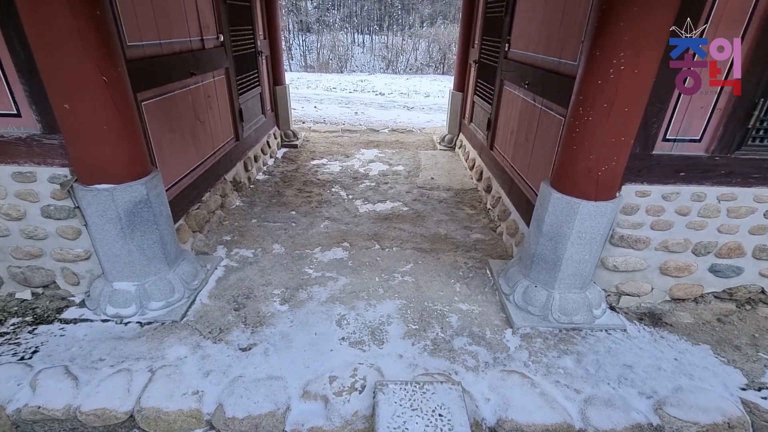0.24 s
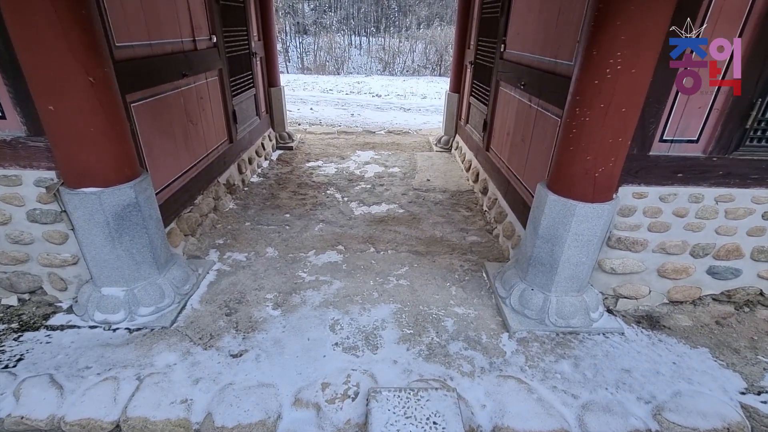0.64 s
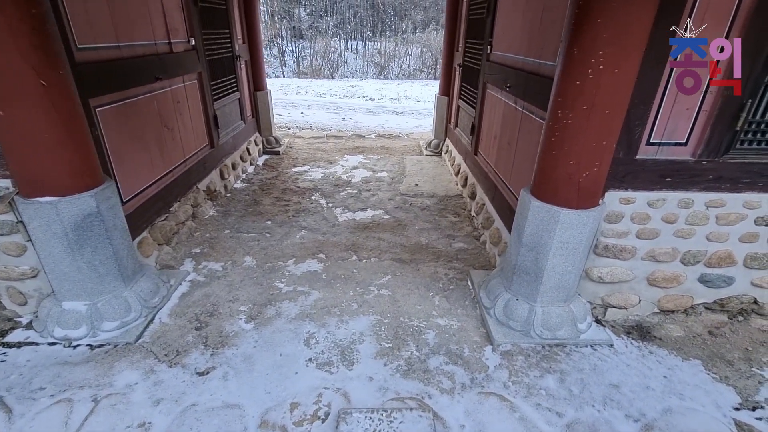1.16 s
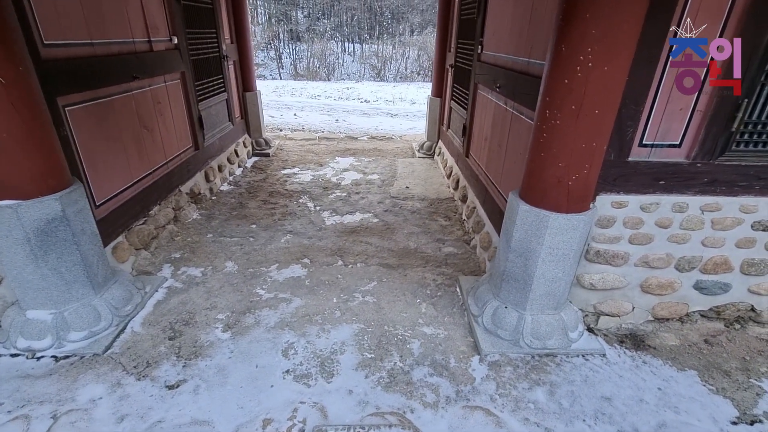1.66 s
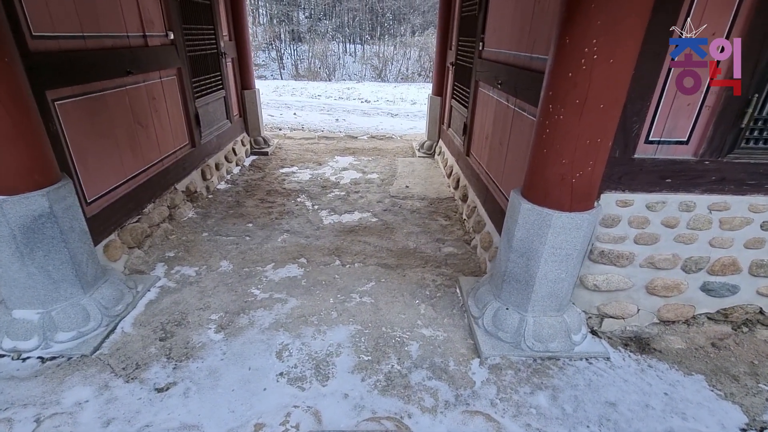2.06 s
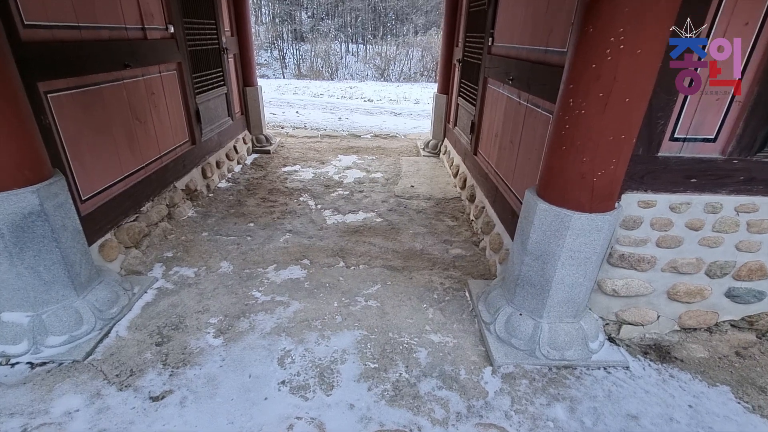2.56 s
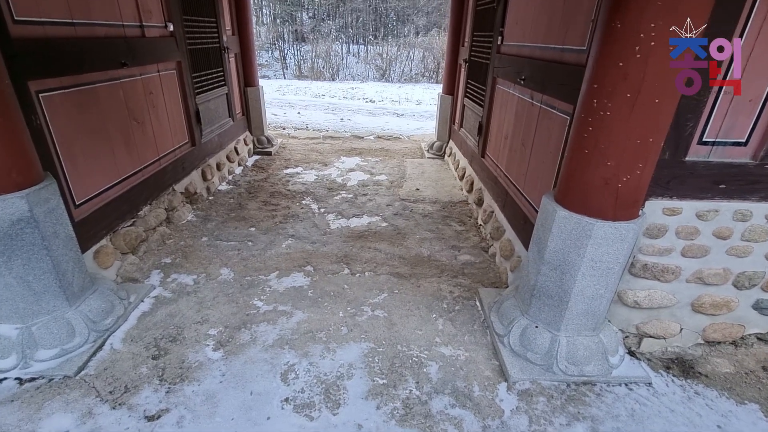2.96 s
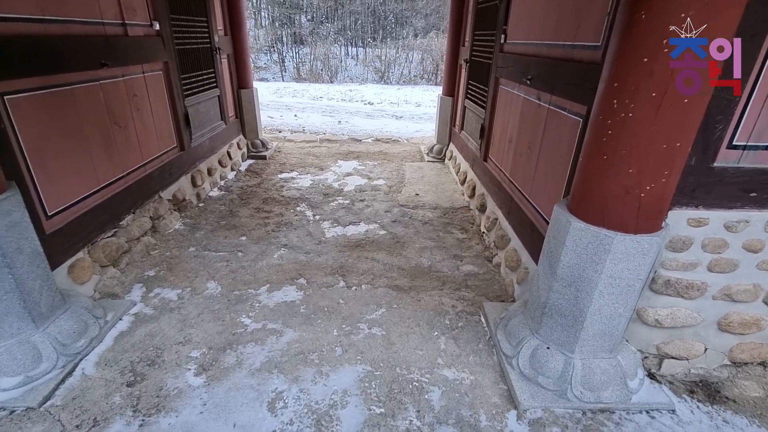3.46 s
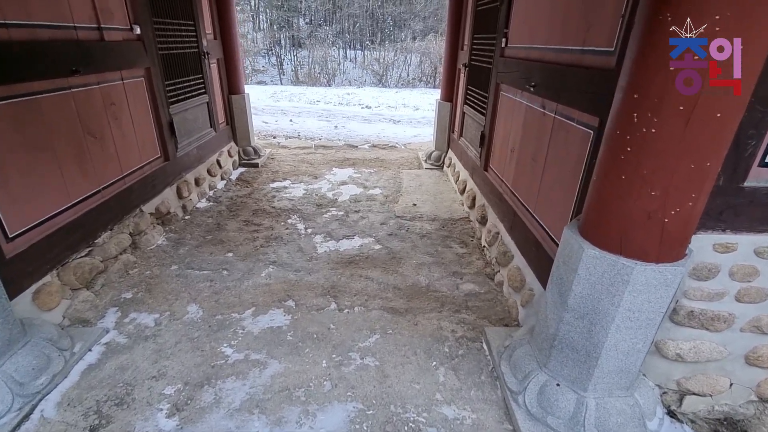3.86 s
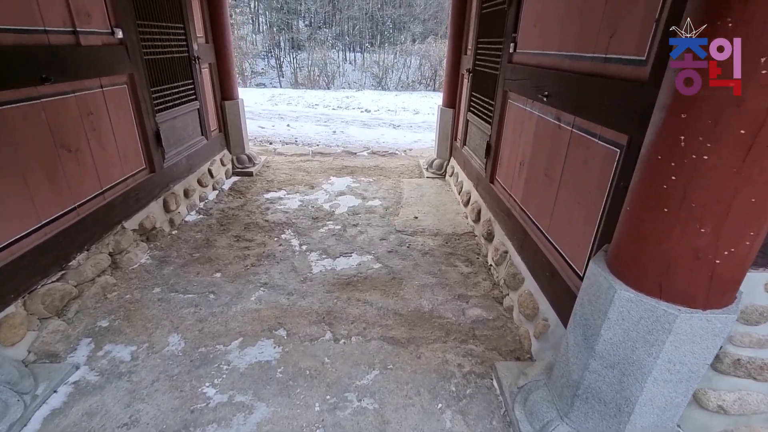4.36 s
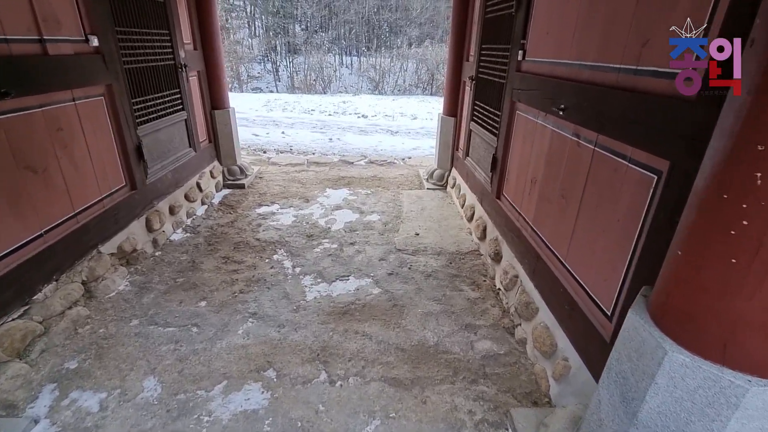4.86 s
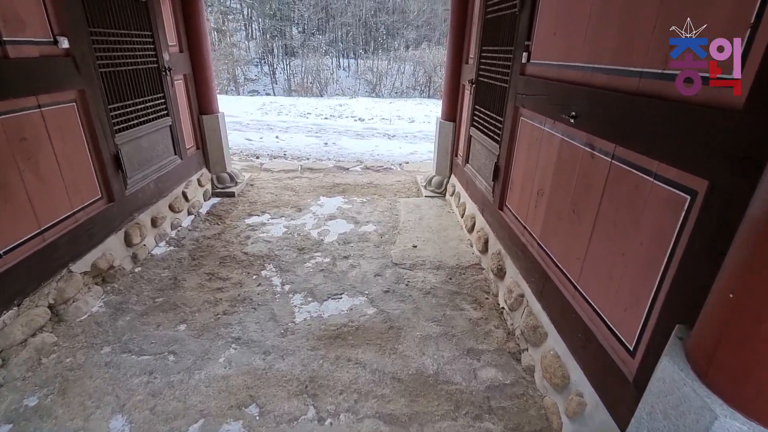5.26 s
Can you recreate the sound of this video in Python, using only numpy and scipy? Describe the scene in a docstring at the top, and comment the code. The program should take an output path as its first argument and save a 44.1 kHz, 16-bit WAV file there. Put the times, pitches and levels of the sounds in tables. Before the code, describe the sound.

Someone walks from snow onto icy grit: dull crunches first, then sharp cracks, scuffs and low hollow thuds under a short echo.

```python
"""Footsteps from snow to frozen grit

Someone walks slowly from packed snow onto gritty, frozen ground in a wooden gateway.
Fracture: each tread presses the snow, which gives way in short dull pulses over a crunch of tiny breaks.
Friction: grit hisses as the shoes slide, made of dense trains of coloured grains.
Resonance and reflection: a wavering low tone rings hollow after some steps, and decaying noise taps
form the short echo of the walls. Steady coloured noise is the still winter air."""
import sys
import numpy as np
from scipy import signal
from scipy.fft import rfft, irfft
from scipy.io import wavfile
from scipy.ndimage import uniform_filter1d

SR = 44100
rng = np.random.default_rng(int(sys.argv[2]) if len(sys.argv) > 2 else 0)


def file_out(sig):
    """Save sig as 16-bit WAV at sys.argv[1]."""
    # one column per channel
    cols = np.atleast_2d(sig).T
    # limit, then scale
    lim = np.clip(cols, -1, 1)
    pcm = np.round(lim * 32767).astype(np.int16)
    wavfile.write(sys.argv[1], SR, pcm)


N = 242991
TIME = np.arange(N) / SR  # s


def amp(db):
    """Level law: decibels to an amplitude ratio."""
    return 10 ** (np.asarray(db) / 20)


def unit(x):
    """Normalisation to an rms of 1."""
    return x / np.sqrt(np.mean(x ** 2) + 1e-20)


def read(points, hz):
    """Interpolation of a spectrum along a logarithmic frequency axis."""
    f, value = np.transpose(points)
    return np.interp(np.log(hz + 1), np.log(f), value)


def add(mix, s, sound):
    """Superposition: adds a sound to the mix from time s."""
    part = mix[:, max(round(s * SR), 0):][:, :sound.shape[1]]
    part += sound[:, :part.shape[1]]


# correlation between the two channels: (f/Hz, coefficient)
CORRELATION = [(30, 0), (80, 0.75), (170, 0.84), (350, 0.8), (700, 0), (1300, 0.13), (2500, 0.38),
               (4500, -.2), (8000, -.15), (15000, 0.01)]


def colour(x, spectrum):
    """Spectral shaping and partial coherence: filters two unrelated signals into a stereo pair of rms 1."""
    a, b = rfft(x)
    hz = np.fft.rfftfreq(x.shape[1], 1 / SR)
    same = np.clip(read(CORRELATION, hz), -1, 1)
    mid = np.sqrt(1 + same) * a
    side = np.sqrt(1 - same) * b
    pair = np.array([mid + side, mid - side])
    return unit(irfft(pair * amp(read(spectrum, hz)), x.shape[1]))


def wander(per_s):
    """Slow random fluctuation: low-passed noise of rms 1, with its corner at per_s Hz."""
    slow = rng.standard_normal(4096)
    hz = np.fft.rfftfreq(len(slow), TIME[-1] / len(slow))
    slow = unit(irfft(rfft(slow) / (1 + (hz / per_s) ** 4)))
    return np.interp(TIME, np.linspace(0, TIME[-1], len(slow)), slow)


def grains(per_s, spread_db):
    """Shot noise: two trains of tiny fractures at the same moments, mostly small, a few large."""
    size = amp(spread_db * np.minimum(rng.exponential(1, N), 3.5)) * (rng.random(N) < per_s / SR)
    angle = rng.uniform(0, 2 * np.pi, N)
    return size * np.array([np.cos(angle), np.sin(angle)])


def wavelet(t, hz, cycles):
    """Impulsive radiation: a short pressure pulse under a Gaussian envelope."""
    return np.exp(-np.minimum((t * hz / cycles) ** 2, 20)) * np.cos(2 * np.pi * hz * t)


def dying(t, t60):
    """Exponential decay: starts at t = 0 and falls 60 dB in t60."""
    return (t >= 0) * amp(-60 * np.maximum(t, 0) / t60)


def patchy(x, depth_db, width_hz, length_s, apart):
    """Shifting contact: random time-frequency patches favour a few pitches, partly apart per channel."""
    hz, t, z = signal.stft(x, SR, nperseg=512)
    field = rng.standard_normal((3,) + z.shape[1:])
    for axis, size in ((1, width_hz / hz[1]), (2, length_s / t[1])):
        field = uniform_filter1d(field, max(round(size), 1), axis)
    gain = amp(depth_db * unit(apart * field[:2] + field[2]))
    return unit(signal.istft(z * gain, SR, nperseg=512)[1][:, :N])


def moves(rows, rise_s, trickle_db=-25, trickle_t60=3.7):
    """Build-up and decay: gain of foot moves (start s, length s, dB, t60 s), added in power."""
    power = np.zeros(N)
    for s, length, db, t60 in rows:
        t = TIME[max(int(s * SR), 0):][:2 * SR] - s
        after = np.maximum(t - length, 0)
        # disturbed snow trickles on, far quieter
        release = np.maximum(dying(after, t60), amp(trickle_db) * dying(after, trickle_t60))
        add(power[None], s, (amp(db) * np.clip(t / rise_s, 0, 1) * release)[None] ** 2)
    return np.sqrt(power + 1e-10)


# spectrum of the air: (f/Hz, relative level/dB)
AIR_SPECTRUM = [(20, -21), (60, 7), (130, -5), (350, 10.5), (1000, 5), (2000, -1), (4000, -6), (7000, -7.5),
                (8500, -23.5), (15000, -20)]


def still_air(air_db=-62):
    """Stationary noise: coloured noise of constant level for the still winter air."""
    return amp(air_db) * colour(rng.standard_normal((2, N)), AIR_SPECTRUM)


# decay of the gateway's echo: (f/Hz, t60/s)
WALL_DECAY = [(150, 0.58), (500, 0.27), (1500, 0.19), (5000, 0.12), (15000, 0.037)]


def gateway(x, far_db=-20, near_db=-15):
    """Reverberation: a short echo from the wooden walls that grows as the walker nears them."""
    taps = rng.standard_normal((2, SR // 2)) * (rng.random((2, SR // 2)) < .05)
    taps = colour(taps, [(80, -16.0), (500, 1.5), (3000, -2.5), (15000, -20)])
    hz, t, z = signal.stft(taps, SR, nperseg=256)
    decay = amp(-60 * t / read(WALL_DECAY, hz)[:, None]) * np.clip(t / 0.0018, 0, 1)
    tail = signal.istft(z * decay, SR, nperseg=256)[1]
    wet = amp(np.interp(TIME, [0, TIME[-1]], [far_db, near_db]))
    return wet * signal.fftconvolve(x, tail / np.linalg.norm(tail[0]), axes=1)[:, :N]


# footfalls that set off the hollow ring: (t/s, level before the swell/dB)
RINGS = [(3.39, -34.5), (3.69, -47), (3.767, -34.5), (4.25, -34), (4.306, -30.5), (4.475, -31.5),
         (4.535, -32), (4.617, -30.5), (4.82, -38.5), (4.963, -37.5), (5.02, -40.5), (5.133, -32),
         (5.24, -45)]


def hollow(ring_hz=173, width_hz=13.8, ring_t60=0.35, swell_s=0.018):
    """Resonance: one low tone swells after each footfall and wavers in pitch as it dies."""
    turns = np.cumsum(ring_hz + width_hz / 2 * wander(per_s=21.3)) / SR
    t = np.arange(SR // 2) / SR
    power = np.zeros((1, N))
    for s, db in RINGS:
        swell = 1 - np.exp(-(t / swell_s) ** 2)
        add(power, s, (amp(db) * dying(t[None], ring_t60) * swell) ** 2)
    return np.sqrt(power) * unit(np.sin(2 * np.pi * turns))


# the shoe brushes over snow or dry ground: (peak t/s, level/dB, f/Hz, half length to 1/e /s)
BRUSH_STROKES = [(2.522, -40.5, 398, 0.034), (3.303, -46, 408, 0.01), (4.113, -52.5, 3330, 0.05),
                 (4.382, -47, 1500, 0.046), (4.81, -56, 2900, .03), (4.844, -49, 1830, 0.039),
                 (5.192, -53.5, 1130, 0.038), (5.51, -59, 3180, 0.012)]


def brushes():
    """Rubbing friction: Gaussian swells of band noise, each around its own pitch."""
    out = np.zeros((2, N))
    t = np.arange(-4096, 4096) / SR
    for s, db, hz, half_s in BRUSH_STROKES:
        band = [(hz / 4, -40), (hz * 1.0, -9), (hz, 0), (hz * 1.9, -9), (hz * 4, -35)]
        rub = colour(rng.standard_normal((2, len(t))), band)
        add(out, s + t[0], amp(db) * rub * np.exp(-(t / half_s) ** 2))
    return out


# spectrum of fine grit: (f/Hz, relative level/dB)
GRIT_SPECTRUM = [(3000, -41), (6500, -5.5), (8500, -11.5), (10500, -12.5), (12500, -6), (15500, -6),
                 (16500, -12)]
# a shoe flicks loose grit: (t/s, level/dB, t60/s)
GRIT_FLICKS = [(0.223, -69, 0.088), (2.043, -68, 0.07), (3.328, -51, 0.48), (4.015, -45, 0.23),
               (4.582, -43, 0.084), (4.958, -45, 0.29)]
# a grain squeaks under the sole: (t/s, level before the onset ramp/dB, f/Hz, t60/s)
GRAIN_SQUEAKS = [(0.006, -43.5, 2210, 0.18), (2.923, -43.5, 4700, 0.11), (2.937, -46, 3940, 0.084),
                 (4.003, -50, 7450, 0.24), (4.015, -47, 4480, 0.24), (4.015, -47, 3340, 0.12),
                 (4.031, -43, 15300, 0.21), (4.284, -45, 5620, .05), (3.815, -39, 2240, 0.2)]


def loose_grit(squeak_width=0.077):
    """Impact and stick-slip: sudden sprays of fine grit, and brief fuzzy squeaks as narrow noise bands."""
    spray = colour(grains(per_s=6800, spread_db=0.5), GRIT_SPECTRUM)
    out = spray * sum(amp(db) * dying(TIME - s, t60) for s, db, t60 in GRIT_FLICKS)
    t = np.arange(8192) / SR
    for s, db, hz, t60 in GRAIN_SQUEAKS:
        low, high = hz * (1 - 2 * squeak_width), hz * (1 + 2 * squeak_width)
        band = [(hz / 2, -60), (low, -22), (hz, 0), (high, -22), (hz * 2, -60)]
        squeak = colour(rng.standard_normal((2, len(t))), band)
        add(out, s, amp(db) * squeak * dying(t, t60) * np.minimum(t / 0.0026, 1))
    return out


# spectrum of the scuff: (f/Hz, relative level/dB)
SCUFF_SPECTRUM = [(700, -2), (1500, 4), (2200, -1), (3100, 1.5), (4600, -4), (6900, -3), (8200, -15.5),
                  (11000, -58), (16000, -58)]
# a sole slides: (start t/s, length/s, scuff level before trim/dB, fine grit level before trim/dB, t60/s)
SOLE_SLIDES = [(-.02, 0.039, -57.5, -76, 0.9), (0.169, 0.09, -59.5, -73, 0.42),
               (0.6, 0.1, -54.5, -68, 0.36), (0.765, 0.2, -58, -66.5, 0.35),
               (1.027, 0.58, -57.5, -68.5, 0.74), (1.602, 0.087, -74, -77, 0.44),
               (2.03, 0.047, -70, -87, 0.47), (2.438, 0.05, -55, -65, .3), (2.483, 0.12, -41, -48.5, 0.75),
               (2.672, 0.17, -46, -51, 0.088), (2.853, 0.039, -45, -51, 0.65),
               (3.106, 0.07, -50, -57.5, 0.35), (3.313, 0.11, -42, -50, 0.63),
               (3.639, 0.059, -44, -53.5, 0.9), (3.746, .12, -43.5, -44, 0.32),
               (4.009, 0.23, -51.5, -53.5, 0.72), (4.292, 0.02, -45, -43, 0.21),
               (4.327, 0.26, -50, -52.5, 0.15), (4.559, 0.019, -43, -45.5, 0.76),
               (4.759, 0.1, -45, -52.5, 0.42), (4.94, 0.11, -52, -56.5, 0.22),
               (5.095, 0.14, -56.5, -78, 0.56), (5.409, 0.2, -52.5, -66, 0.68)]


def scuff(rise_s=0.029, scuff_db=-3.0, grit_db=-3.0, catch_db=1.1, left_db=2.0):
    """Sliding friction: sand and ice grains rasp under the sole, which catches and lets go."""
    slide = moves([(s, length, db, t60) for s, length, db, _, t60 in SOLE_SLIDES], rise_s)
    grit = moves([(s, length, db, t60) for s, length, _, db, t60 in SOLE_SLIDES], rise_s)
    catch = unit(amp(catch_db * wander(per_s=94)))
    rasp = colour(grains(per_s=7000, spread_db=3), SCUFF_SPECTRUM)
    rasp = patchy(rasp, depth_db=3, width_hz=350, length_s=.04, apart=0.97)
    fine = colour(grains(per_s=7000, spread_db=2), GRIT_SPECTRUM)
    # the rasp leans to the left
    rasp *= amp(scuff_db + np.array([[left_db], [-left_db]])) * slide
    return catch * (rasp + fine * amp(grit_db) * grit)


# how thick the snow lies under the sole: (t/s, 0 thin crust - 1 packed layer)
SNOW_DEPTH = [(0, 0.67), (.3, 0.97), (.8, 0.81), (2.3, 0.43), (2.5, 0.92), (3.35, 0.9), (3.75, 0.64),
              (4.6, 0.39), (5.2, 0.82), (5.5, .12)]


def snow_depth(s):
    """Layer thickness: the snow underfoot at time s, interpolated between 0 and 1."""
    return np.clip(np.interp(s, *np.transpose(SNOW_DEPTH)), 0, 1)


# a sole bears down: (start t/s, length/s, crunch level before trim/dB, weight level before trim/dB)
SOLE_TREADS = [(-.02, 0.046, -48, -62), (0.181, .07, -51, -70), (0.425, 0.012, -52.5, -57),
               (0.764, .42, -47.5, -61.5), (1.21, .36, -47.5, -57.5), (1.653, .09, -61, -86),
               (1.876, 0.015, -58.5, -62.5), (2.208, 0.18, -57.5, -84), (2.505, 0.097, -35.5, -77),
               (2.623, .12, -41.5, -54.5), (2.735, 0.088, -39.5, -42.5), (2.864, 0.069, -36, -50),
               (2.999, 0.07, -47.5, -47), (3.115, .07, -40.5, -47), (3.303, .12, -31.5, -42),
               (3.526, 0.098, -46, -54), (3.667, 0.085, -41.5, -56), (3.734, 0.053, -36.5, -46),
               (4.265, 0.023, -42.5, -46), (4.352, 0.036, -38, -52), (4.45, .15, -41, -56),
               (4.823, 0.027, -51.5, -72), (4.95, 0.14, -48, -54), (5.116, 0.088, -45, -50),
               (5.475, 0.059, -57, -43)]


def treads(rise_s=.02, t60=.24):
    """Loading and release: the gains of the sole's press on the snow and of the walker's weight."""
    press = moves([(s, length, db, t60) for s, length, db, _ in SOLE_TREADS], rise_s)
    load = moves([(s, length, db, t60) for s, length, _, db in SOLE_TREADS], rise_s)
    return press, load


# the snow crust breaks: (t/s, pulse level/dB, f/Hz, icy snap level/dB, thud level before trim/dB)
CRUST_BREAKS = [(0.011, -46.5, 1600, -52, -57), (0.023, -33.5, 1346, -49.5, -53),
                (.038, -35, 830, -50, -41.5), (0.2244, -35, 570, -60, -56), (0.434, -28.5, 1260, -50, -41),
                (.5736, -42.5, 830, -60, -62), (0.7849, -28.5, 690, -47.5, -40),
                (0.8838, -35, 565, -73, -56), (0.9284, -28.5, 1030, -73, -36),
                (0.9971, -30.5, 945, -60, -39), (1.0462, -31, 1220, -61, -45),
                (1.0786, -34, 1310, -72, -34), (1.148, -34.5, 524, -80, -43.5),
                (1.2716, -29.5, 590, -60, -34.5), (1.3161, -28.5, 680, -68.5, -42),
                (1.3552, -32.5, 705, -61, -35), (1.386, -36, 670, -56, -35.5), (1.4766, -32, 850, -54, -40),
                (1.5421, -22, 1170, -48, -37), (1.6031, -29, 970, -55, -34), (1.72, -38, 1150, -67, -80),
                (1.7366, -37.5, 1010, -65, -67), (1.7674, -34, 1220, -65, -58),
                (1.8911, -25.5, 1000, -59, -42), (2.0128, -39.5, 786, -69, -59),
                (2.043, -34, 1220, -56.5, -48), (2.0966, -37.5, 1080, -63, -72),
                (2.131, -41, 1310, -83, -74), (2.186, -36.5, 1140, -65, -70), (2.222, -28, 1170, -77, -52),
                (2.248, -33, 1170, -72, -70), (2.2686, -36, 1240, -76, -71),
                (2.3067, -36.5, 1170, -77, -72), (2.34, -29, 1310, -66, -74),
                (2.366, -32, 1000, -63, -55.5), (2.5402, -26, 620, -46, -63),
                (2.6211, -24.5, 800, -50, -44), (2.688, -24.5, 990, -51, -36), (2.7595, -22, 473, -68, -39),
                (2.7925, -26, 554, -75, -33), (2.8983, -22, 510, -42, -27.5), (2.97, -29, 545, -64, -43),
                (3.017, -35, 486, -64, -36), (3.044, -29, 616, -50.5, -35), (3.0933, -26.5, 605, -55, -32),
                (3.132, -25.5, 576, -49.5, -25.5), (3.1603, -20, 514, -46, -30),
                (3.201, -28.5, 476, -66, -29), (3.291, -26.5, 443, -62, -43), (3.341, -21, 790, -45, -36),
                (3.5084, -26, 695, -59, -33), (3.54, -24.5, 760, -50.5, -37),
                (3.5725, -22.5, 944, -56, -50), (3.609, -22.5, 865, -52.5, -36),
                (3.6783, -16.5, 950, -47, -34), (3.7025, -16, 960, -51, -55), (3.767, -7, 910, -35.5, -33),
                (3.798, -20, 870, -38, -26), (3.833, -20, 825, -42.5, -37), (4.092, -38, 730, -55, -52),
                (4.176, -26, 770, -54, -37), (4.2156, -26, 686, -65, -47), (4.2527, -21, 1190, -49, -34),
                (4.303, -20.5, 1070, -50, -47), (4.311, -16, 1020, -40, -40),
                (4.3686, -12.5, 1130, -37, -30.5), (4.4364, -27.5, 1010, -54, -45),
                (4.478, -24, 545, -40.5, -24.5), (4.5481, -21.5, 810, -43, -29.5),
                (4.581, -27, 1370, -38.5, -32), (4.622, -15.5, 645, -44.5, -27.5),
                (4.7004, -33.5, 626, -61, -37), (4.828, -30, 716, -52, -37.5),
                (4.9715, -30, 810, -52.5, -38.5), (5.4382, -29.5, 1410, -56, -56),
                (5.4871, -25, 1010, -41.5, -49)]


def settling(after_db=4, settle_s=0.0043):
    """Relaxation: a gain that is highest just after a listed break, then falls and holds until the next."""
    starts = np.array([0] + [row[0] for row in CRUST_BREAKS])
    since = TIME - starts[np.searchsorted(starts, TIME, side="right") - 1]
    return amp(after_db * (np.exp(-since / settle_s) - .5))


# spectra of thick snow, thin crust and the push of the weight: (f/Hz, relative level/dB)
THICK_SPECTRUM = [(120, -57), (200, -3.5), (330, 10), (430, 3.5), (700, 7.5), (1150, -1), (1500, -10.5),
                  (2300, -11.5), (4000, -50)]
CRUST_SPECTRUM = [(130, -11.5), (260, -3.5), (500, 0.5), (800, -12.5), (1200, 12), (1600, 0.5), (2300, -12),
                  (4000, -48)]
WEIGHT_SPECTRUM = [(20, -37), (45, -38), (75, -11), (98, -13), (125, -23), (175, 4.5), (260, -2.5),
                   (500, -62)]


def crunch(press, load, crunch_db=1.5, weight_db=-3, light_per_s=850, crowding=0.58,
           clump_db=1.5, lump_db=3.0):
    """Superposed microfracture: small breaks, denser under harder press, over the push of the weight."""
    depth = snow_depth(TIME)
    per_s = light_per_s * (press / np.median(press)) ** crowding
    breaks = grains(per_s, spread_db=5) / np.sqrt(per_s)
    # thick snow is duller than thin crust
    snow = depth * colour(breaks, THICK_SPECTRUM) + (1 - depth) * colour(breaks, CRUST_SPECTRUM)
    snow = patchy(snow, depth_db=5.0, width_hz=170, length_s=0.033, apart=0.55)
    snow = snow * unit(amp(clump_db * wander(per_s=16)))
    # snow gives way under the load with a low rumble; thin crust does so less
    push = colour(grains(per_s=1100, spread_db=3.0), WEIGHT_SPECTRUM)
    push = push * unit(amp(lump_db * wander(per_s=62))) * amp(5.4 * depth)
    return settling() * (amp(crunch_db) * press * snow + amp(weight_db) * load * push)


def small_cracks(press, over_db=9, limit_db=-30, spread_db=3, thin_hz=1250, packed_hz=550,
                 icy_db=-24, low_db=-17, count=150):
    """Yield under load: lesser breaks as strong as the press, up to what the crust bears, lower in thick snow."""
    rows = []
    for k, (jitter, size, pitch) in enumerate(rng.random((count, 3))):
        at = int((k + jitter) / count * N)  # uneven intervals
        db = min(20 * np.log10(press[at]) + over_db, limit_db) + spread_db * (2 * size - 1)
        hz = np.interp(snow_depth(TIME[at]), [0, 1], [thin_hz, packed_hz]) * 2 ** (pitch - .5)
        rows.append((TIME[at], db, hz, db + icy_db, db + low_db))
    return rows


# spectrum of the icy snap: (f/Hz, relative level/dB)
SNAP_SPECTRUM = [(900, -23), (2000, 6), (3200, 4.5), (5000, -3), (7000, -7), (8500, -18), (15000, -40)]


def cracks(rows, cycles=0.54, warning=0.033, crumble_db=-13, crumble_t60=0.045, crumble_rise_s=0.00076,
           snap_t60=0.096, tick_db=3, tick_s=0.00069, thud_db=-1, thud_t60=0.061,
           snow_hz=155, ground_hz=230, bounce=0.37, pan_db=1.0):
    """Brittle fracture: a short pulse, its bounce off the ground, crumbling snow, an icy snap and a thud."""
    out = np.zeros((2, N))
    lead = 256 / SR  # s before the break
    sides = np.array([[1], [-1]])
    t = np.arange(4096) / SR - lead
    for s, db, hz, icy_db, low_db in rows:
        pan, lag, path, chance = rng.uniform(-1.1, 1, 4)
        crumbs, ice = rng.standard_normal((2, 2, len(t)))
        pulse = wavelet(t + sides * lag * 3e-5, hz, cycles) * amp(sides * pan * pan_db)
        # the crust starts to split a moment before it breaks
        pulse += warning * wavelet(t + 0.00143 + 0.00031 * chance + sides * lag * 1e-4, hz * 0.67, cycles)
        pulse += bounce * wavelet(t - .0035 - 0.00091 * path + sides * lag * 0.00027, hz * 0.78, cycles)
        crumbs = colour(crumbs, [(hz * 0.15, -22), (hz * 0.13, -3), (hz * 1.4, 0),
                                 (hz * 1.57, -12), (hz * 4, -35), (hz * 12, -60)])
        crumble_rise = 1 - np.exp(-(t / crumble_rise_s) ** 2)
        crumble = amp(crumble_db) * crumbs * dying(t, crumble_t60) * crumble_rise
        # a hard tick as the ice parts, then a short sizzle of splinters
        tick = amp(tick_db) * np.exp(-np.minimum(abs(t - .0006) / tick_s, 20))
        snap = amp(icy_db) * colour(ice, SNAP_SPECTRUM) * (tick + dying(t + 0.0019, snap_t60))
        # bare ground is stiffer than snow, so it thuds higher; each thud strays in pitch
        thud_hz = np.interp(s, [3.4, 4.2], [snow_hz, ground_hz]) * 2 ** (chance / np.pi)
        thud = amp(low_db + thud_db) * np.cos(2 * np.pi * thud_hz * t)
        thud = thud * dying(t, thud_t60) * np.clip(t * thud_hz * 2, 0, 1)
        add(out, s - lead, amp(db) * (pulse + crumble) + snap + thud)
    return out


def scene():
    """Superposition of the steps, their echo, the hollow ring and the still winter air."""
    press, load = treads()
    steps = cracks(list(CRUST_BREAKS) + small_cracks(press)) + crunch(press, load)
    steps = steps + scuff() + brushes() + loose_grit()
    return still_air() + gateway(steps) + hollow() + steps


def record(dry, low_cut_hz=64, edge_hz=16000):
    """Band limitation: a low cut against rumble and a steep upper edge."""
    thin = signal.sosfilt(signal.butter(2, low_cut_hz, "highpass", fs=SR, output="sos"), dry)
    edge = signal.firwin(511, edge_hz, window=("kaiser", 9), fs=SR)
    return signal.oaconvolve(thin, edge[None], "same")


dry = scene()
out = record(dry)
file_out(out)
```